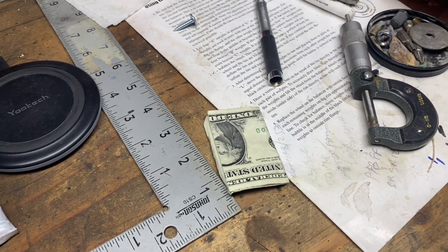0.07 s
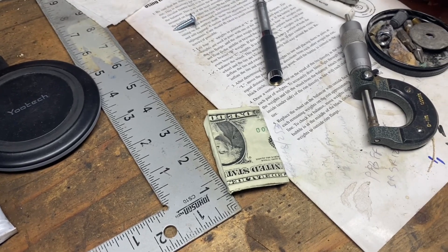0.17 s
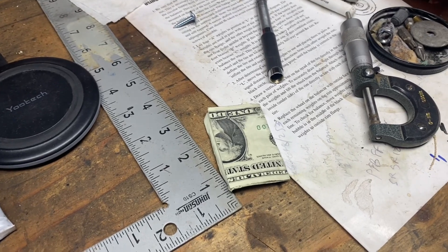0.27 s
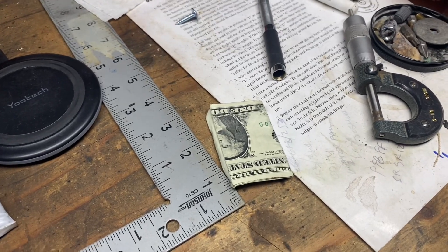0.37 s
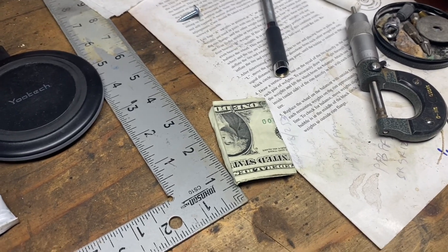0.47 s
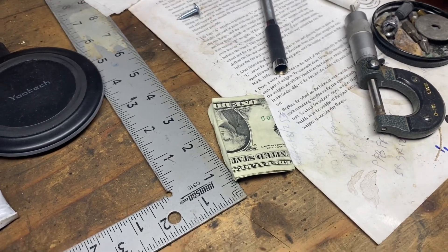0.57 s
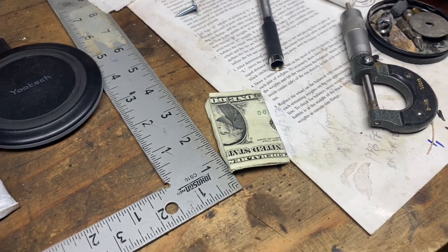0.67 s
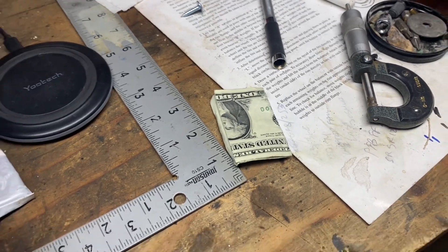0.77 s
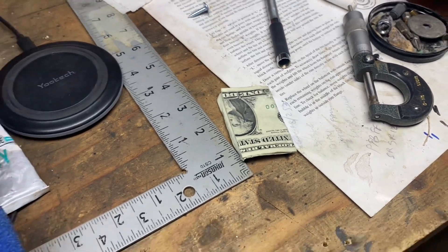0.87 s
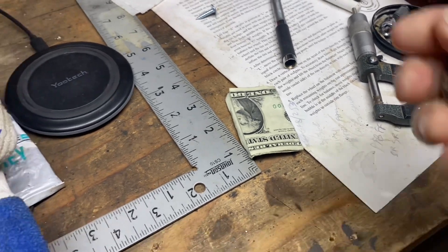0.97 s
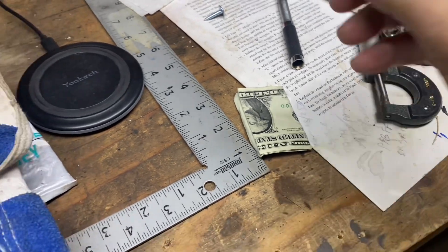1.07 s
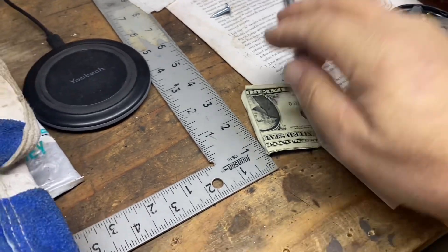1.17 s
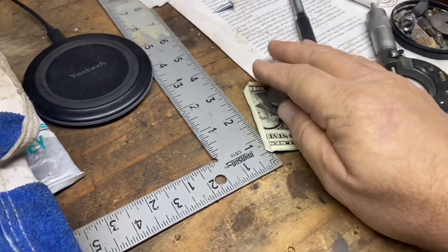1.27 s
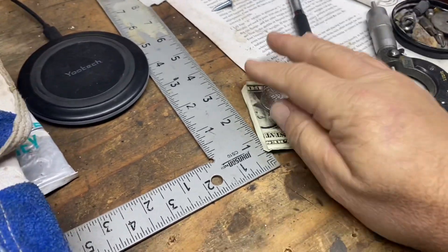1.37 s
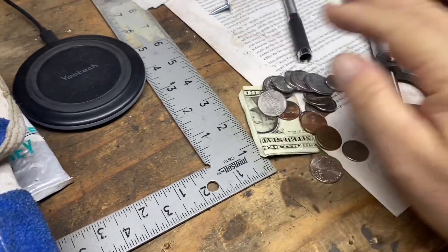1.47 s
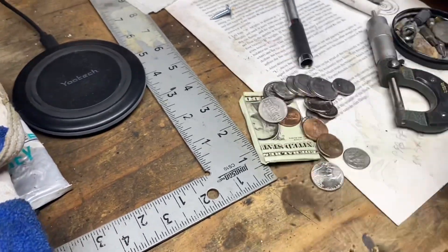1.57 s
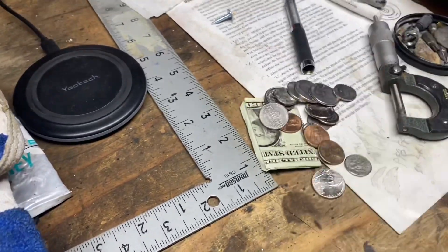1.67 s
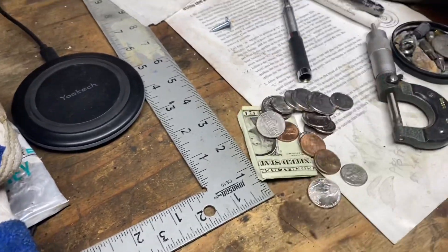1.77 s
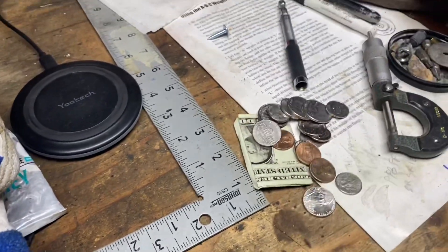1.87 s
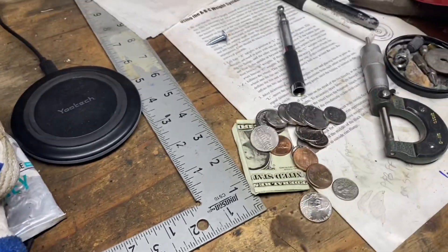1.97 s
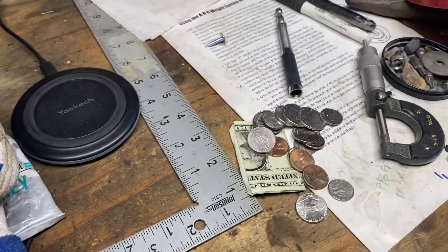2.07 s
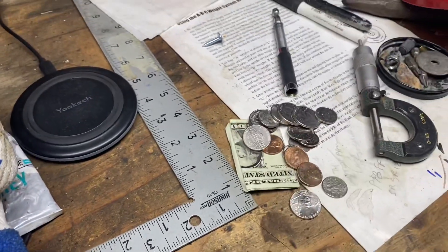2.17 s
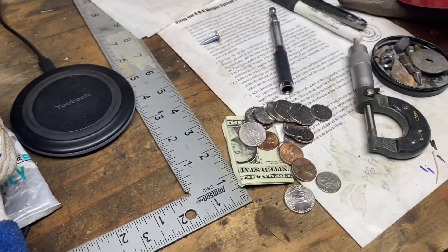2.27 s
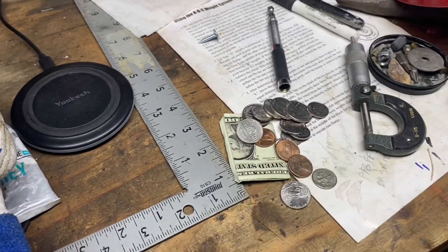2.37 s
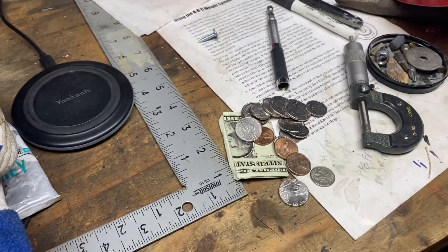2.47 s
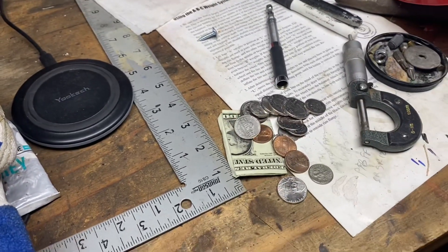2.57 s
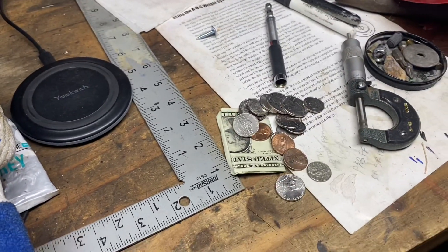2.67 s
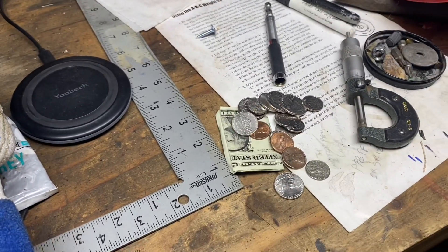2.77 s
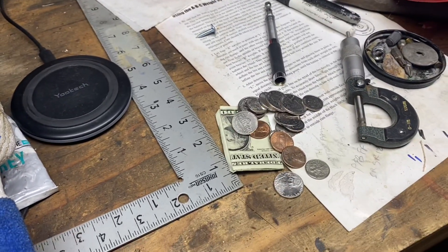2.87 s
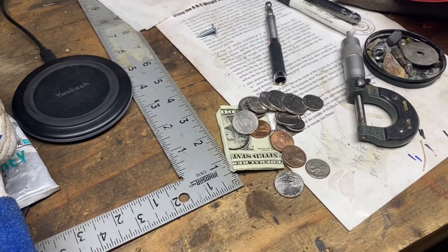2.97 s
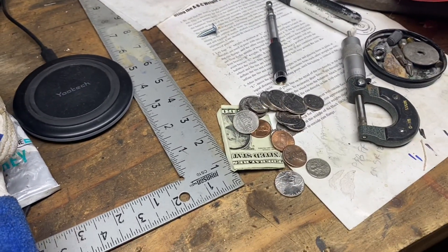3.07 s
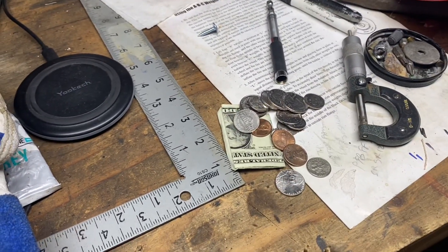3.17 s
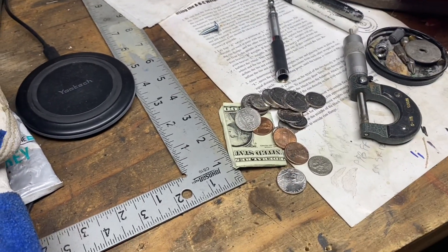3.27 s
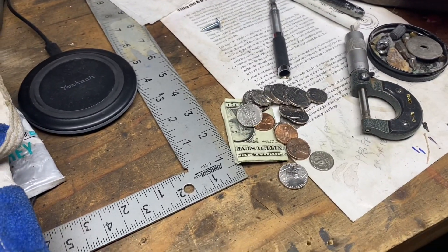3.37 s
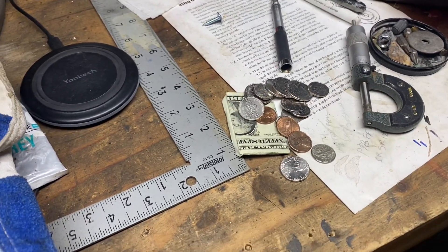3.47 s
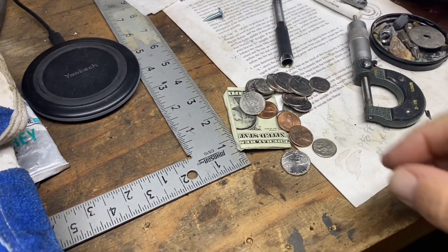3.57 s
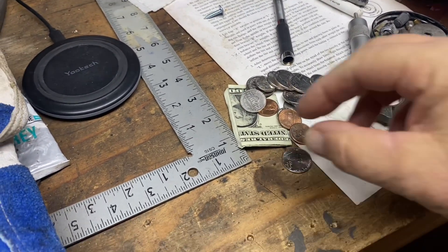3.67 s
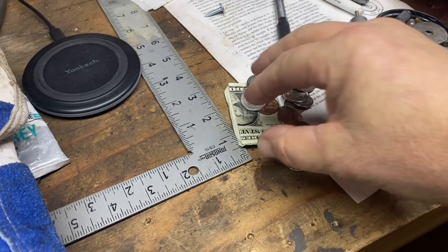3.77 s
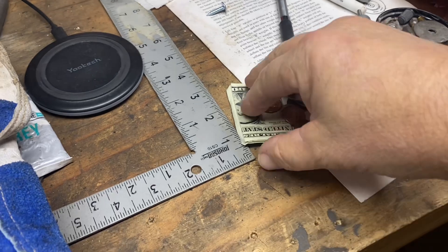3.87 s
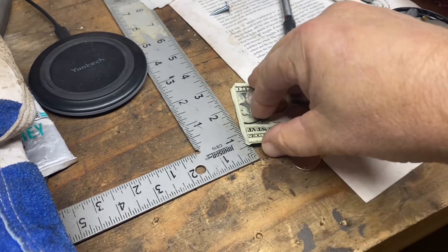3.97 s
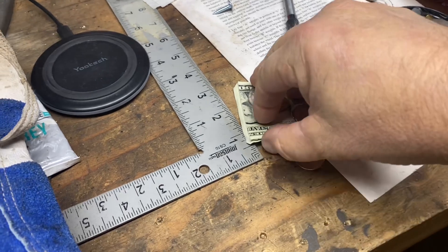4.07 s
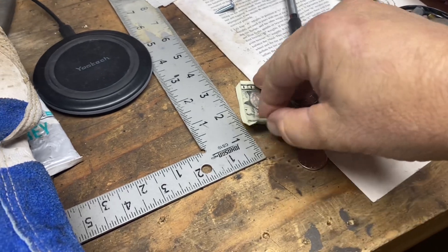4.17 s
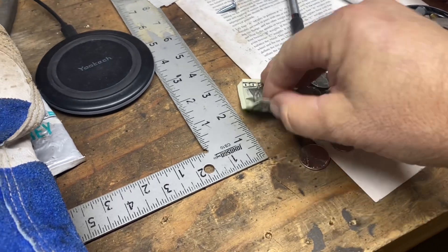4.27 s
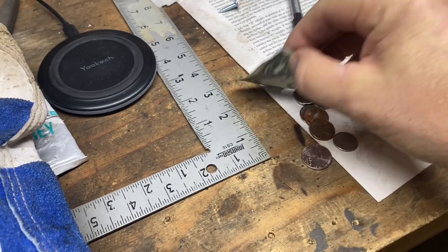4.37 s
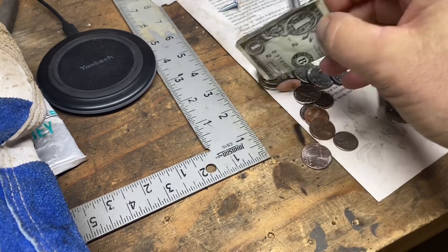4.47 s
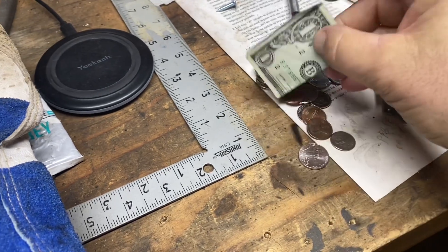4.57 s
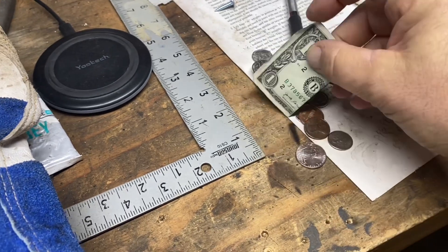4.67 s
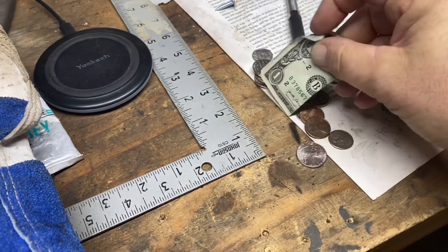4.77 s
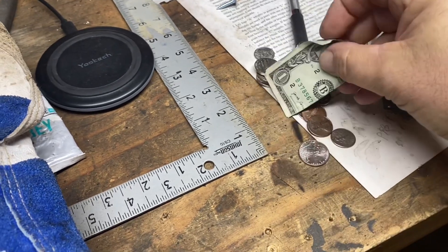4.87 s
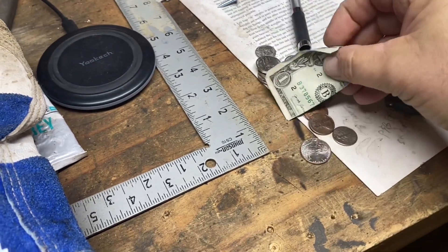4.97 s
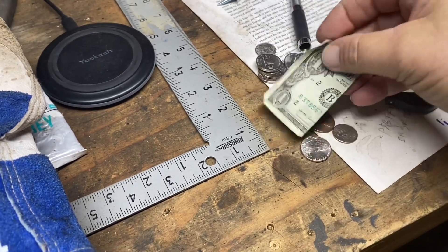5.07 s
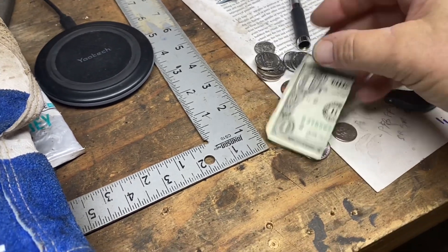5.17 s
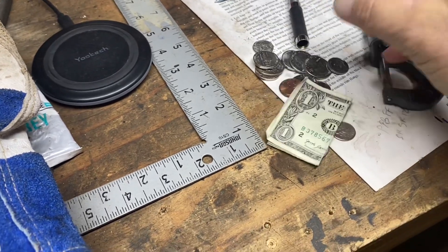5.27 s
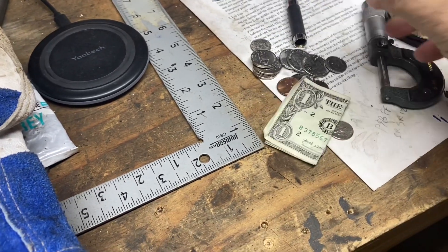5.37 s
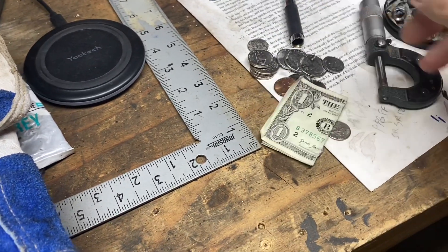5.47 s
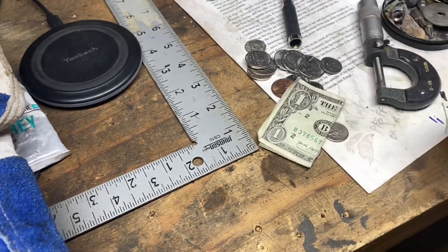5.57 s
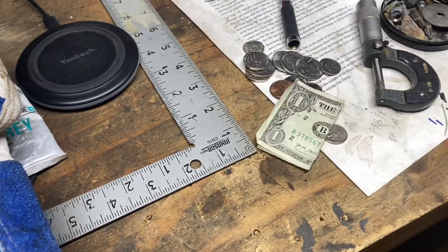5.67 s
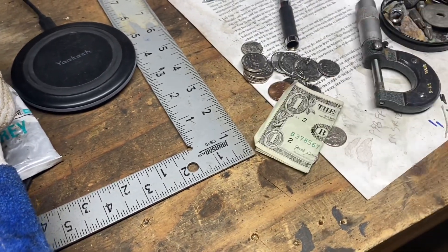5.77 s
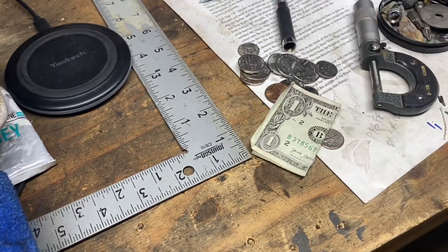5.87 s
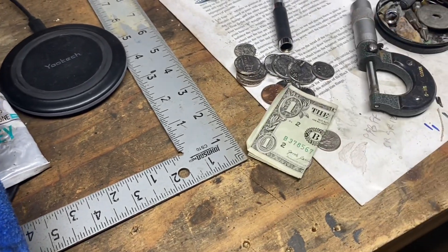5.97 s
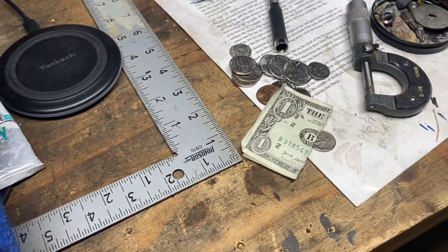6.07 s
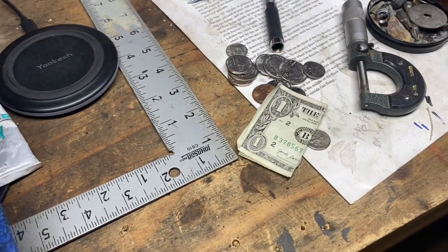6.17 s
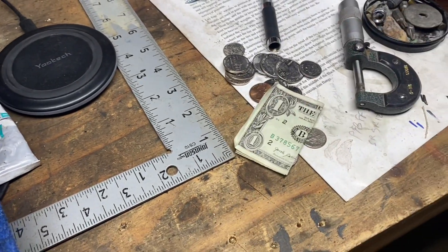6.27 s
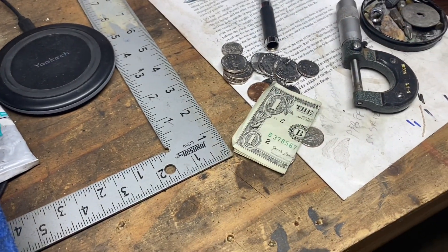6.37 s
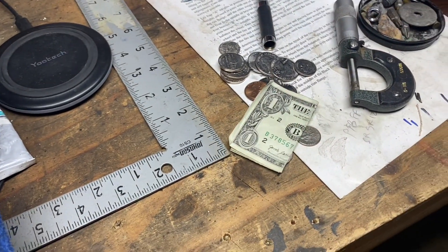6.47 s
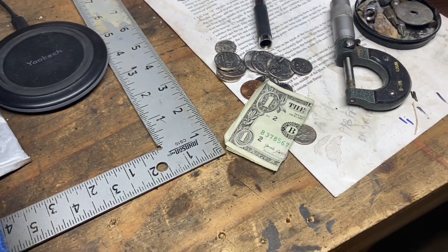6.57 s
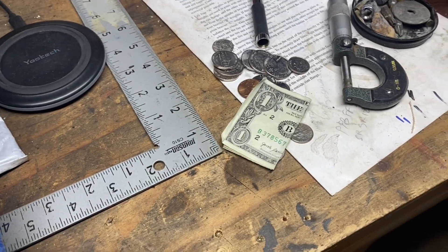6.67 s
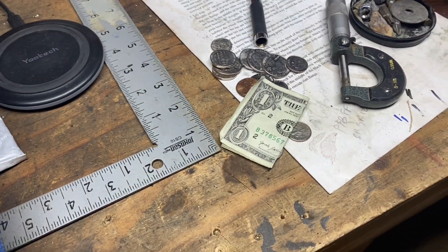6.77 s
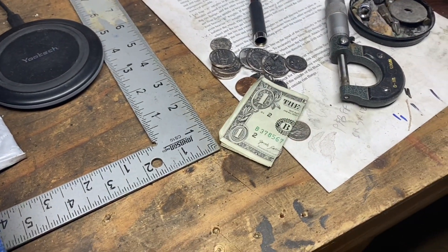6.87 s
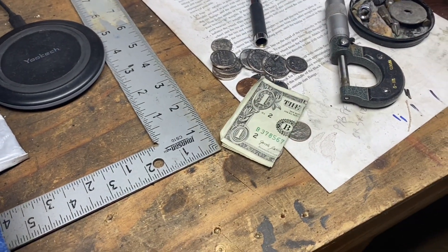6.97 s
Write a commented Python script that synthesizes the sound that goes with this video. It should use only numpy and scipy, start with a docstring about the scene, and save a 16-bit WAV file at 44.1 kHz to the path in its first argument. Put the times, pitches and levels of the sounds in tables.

```python
"""Change in a palm, a folded bill, a wooden bench; a hand-held phone close by in a small quiet workshop.
0-1.2 s: skin and sleeve brush, coins jingle (noise chinks, edge clicks), then are slapped down (plank modes).
1.2-2.7 s: coins settle, soft bumps (damped noise pops), a faint wet-sounding chirp (rising pops).
3.8-5.3 s: bill pulled out and laid on top; coins slide and clink (grainy noise, beating modes), paper crackles.
5.5-7 s: brushing and bumps of the hands. Throughout: still air, rumble in swells, room echo."""
import sys
import numpy as np
from scipy import signal
from scipy.fft import rfft, irfft, next_fast_len
from scipy.io import wavfile
from scipy.ndimage import uniform_filter1d

SR = 44100
rng = np.random.default_rng(int(sys.argv[2]) if len(sys.argv) > 2 else 0)


def dump(signal):
    """Clip the signal to [-1, 1] and save it as 16-bit WAV at the path in sys.argv[1]."""
    limited = np.clip(np.atleast_2d(signal).T, -1, 1)
    pcm = np.round(limited * 32767).astype(np.int16)
    wavfile.write(sys.argv[1], SR, pcm)


N = 309137
HIT_N, BLOW_N = SR // 2, SR // 50  # samples: one short sound; the span that sets its level
T_S = np.arange(HIT_N) / SR

# Levels of events come before the trims (*_db arguments) of the functions that use them.
# coins meeting coins: (time [s], chink level [dB], edge click level [dB], rebound time scale [s])
CLINKS = [(0.627, -74, -66, 0.0096), (0.743, -46, -49, 0.0016), (.758, -44.5, -49, .006),
          (0.768, -39, -48, 0.0083), (0.82, -37, -42.5, 0.0046), (.842, -51, -44, 0.0071),
          (0.881, -68, -51.5, .001), (0.9076, -49, -52, 0.00068), (1.058, -56, -54.5, .002),
          (1.082, -45.5, -51, .0016), (1.1, -47, -52, 0.0062), (1.165, -35, -47.5, .002),
          (1.196, -17.5, -39, 0.0017), (1.204, -23.5, -34, .0022), (3.832, -45, -50.5, 0.01),
          (3.853, -32.5, -42.5, 0.0048), (4.295, -36, -48, 0.0048), (4.321, -42, -51, 0.0045),
          (4.401, -26, -56, 0.0016), (4.407, -26.5, -46, 0.013), (4.484, -51, -68, .0013),
          (4.543, -37, -44, .006), (4.59, -39, -52.5, 0.00076), (5.191, -49, -60.5, 0.00096),
          (5.205, -43.5, -59.5, 0.0038)]
# blows on the bench top: (time [s], thud level [dB], clack level [dB], crack level [dB])
KNOCKS = [(1.196, -26.5, -41, -27.5), (1.2, -25, -23.5, -36), (1.208, -22, -31, -24.5),
          (1.295, -38, -48, -53.5), (1.349, -44.5, -49, -53.5), (3.848, -41.5, -61, -54.5),
          (4.298, -36, -60, -71), (4.401, -21, -39, -55), (4.414, -27, -70, -66), (4.458, -35.5, -59, -60),
          (4.521, -42.5, -61, -60), (4.55, -37.5, -63.5, -66), (4.595, -42, -75, -81),
          (4.671, -38, -65, -57), (4.711, -49, -76, -65), (4.8, -43.5, -65, -74),
          (5.207, -48.5, -61, -49.5)]
# coins left free to ring: (time [s], level [dB], lowest bending mode [Hz], t60 [s])
RINGS = [(1.108, -45.5, 9200, .14), (1.121, -42, 13600, .12), (1.176, -39.5, 14700, .09),
         (1.2, -27, 9840, 0.042), (1.213, -26.5, 14340, .09), (3.872, -41, 15300, 0.14),
         (4.324, -38.5, 13500, .13), (4.402, -40.5, 9290, 0.24), (4.412, -28, 15600, .08),
         (4.414, -29, 13930, 0.19), (4.485, -39.5, 13900, 0.055), (4.549, -27, 14110, .16),
         (4.593, -35, 14200, .12)]
# paper creases, other small dry snaps: (time [s], level [dB], pitch [Hz])
CREASES = [(0.477, -52.5, 5470), (.745, -56.5, 1903), (1.187, -40.5, 2030), (3.967, -56, 5500),
           (3.981, -61, 3470), (3.992, -57, 11000), (4.033, -51, 5100), (4.077, -49, 6740),
           (4.098, -45.5, 3920), (4.099, -52, 1250), (4.121, -59, 2000), (4.154, -47.5, 1460),
           (4.651, -53.5, 1230), (4.833, -51.5, 1680), (4.853, -43, 1400), (4.939, -45.5, 1720),
           (5.112, -52.5, 1537), (5.174, -57.5, 3370)]
# soft bumps of the hands on bench and phone: (time [s], level [dB], pitch [Hz], t60 [s], low boom level [dB])
BUMPS = [(0.442, -38.5, 506, 0.11, -37.5), (1.201, -27, 187.3, .093, -47), (1.202, -24.5, 710, 0.081, -35),
         (1.61, -60, 1110, 0.19, -57), (1.791, -69, 1235, 0.066, -61.5), (1.849, -52, 509.3, 0.063, -51),
         (5.827, -43.5, 850, 0.05, -57.5), (5.9367, -39, 897, 0.017, -58), (5.94, -38, 400, 0.033, -58.5),
         (6.962, -65, 592.6, .08, -55)]
# heap of coins shifting:
# (start [s], length [s], level [dB], swell over the slide [dB], weight on the bench [dB])
COIN_SLIDES = [(.82, 0.032, -52, -7, -34), (1.116, 0.068, -45.5, 2, -28.5), (1.205, 0.31, -43, -14, -1),
               (3.831, 0.066, -41, -3.5, -10), (4.262, 0.17, -52.5, 15, -12),
               (4.462, 0.18, -49.5, -6.5, -9.5), (5.207, 0.072, -47.5, -11, -13)]
# bill dragged and laid down: (start [s], length [s], level [dB], weight on the bench [dB])
PAPER_SLIDES = [(3.958, 0.14, -63, -4.5), (4.088, 0.058, -58.5, 6.5), (4.218, 0.029, -60.5, -4.5),
                (4.642, 0.11, -69.5, 5.5), (4.784, 0.028, -60, 8.5), (4.865, .13, -69.5, 8),
                (5.004, .08, -63, -15.5)]
# skin and sleeve brushing: (start [s], length [s], level [dB], swell over the stroke [dB], brightness [dB])
BRUSHES = [(0, 0.21, -67, 5, -2.5), (0.198, 0.21, -58.5, 3.5, -4), (0.43, 0.019, -49.5, 3.5, -6.5),
           (0.6, 0.039, -78.5, -0.5, 14.5), (0.714, 0.33, -70.5, -1, 7.5), (1.505, 0.033, -65, -2, -5.5),
           (1.53, 0.31, -67, -2, -21.5), (1.836, 0.041, -51.5, 1.5, -15.5), (5.501, 0.34, -81, 16.5, -18.5),
           (5.812, 0.028, -50.5, 3, -12.5), (5.922, 0.033, -49.5, -0.5, -23.5), (6.152, .15, -83, 3, -2),
           (6.948, 0.051, -74, 3.5, -8)]
# shifts of the hand that holds the phone: (start [s], length [s], rumble level [dB])
SWAYS = [(0, 0.52, -62.5), (0.456, 0.058, -57), (1.198, 0.87, -58.5), (3.816, 1.05, -56.5),
         (5.722, 0.26, -54), (6.961, 0.034, -52.5)]
# modes of the bench top: (frequency [Hz], relative level [dB], t60 [s])
BENCH_MODES = [(184.1, -0.5, 0.25), (325, 2, 0.099), (361, -4, 0.0893), (405, 7, 0.066), (445, -2, .08),
               (558, -2, 0.063), (647, -3.5, 0.16), (753, -2.5, 0.046), (934.7, -5.5, 0.021),
               (1217, -1, 0.0722), (1475, 1.5, 0.024), (1570, -6.5, 0.022), (1711, -8, 0.043)]
# spectrum of coin faces chinking: (frequency [Hz], relative level [dB])
CHINK_SPECTRUM = [(5000, -33), (8300, -23.5), (9500, -2), (11200, -7), (12200, -22.5), (13300, -4),
                  (15300, 2), (16500, -14)]
# spectrum of coin edges clicking: (frequency [Hz], relative level [dB])
EDGE_SPECTRUM = [(500, -26), (2000, -7.5), (4000, -4.5), (6600, 5), (8200, -5), (12000, -20)]
# spectrum of the contact crack on the bench: (frequency [Hz], relative level [dB])
CRACK_SPECTRUM = [(700, -13.5), (2000, -5), (3300, -0.5), (5000, 2), (6800, -1), (8200, -15.5),
                  (12000, -25)]
# spectrum of low scuffing: (frequency [Hz], relative level [dB])
SCUFF_SPECTRUM = [(60, -10.5), (200, -1.5), (380, 0.5), (520, -2.5), (800, -4.5), (1550, -3.5),
                  (2400, -15.5), (5000, -30), (16000, -50)]
# spectrum of dry hiss: (frequency [Hz], relative level [dB])
HISS_SPECTRUM = [(500, -15.5), (2000, -3), (3500, 1.5), (5000, 0), (6800, 0), (8300, -11.5), (12000, -16.5),
                 (16000, -21.5)]
# spectrum of coins scraping: (frequency [Hz], relative level [dB])
SCRAPE_SPECTRUM = [(4000, -40), (8300, -20), (9500, 3.5), (11200, -3.5), (12200, -15), (13300, 0),
                   (14400, 1.5), (15400, -1.5), (16500, -12.5)]
# spectrum of the still air: (frequency [Hz], relative level [dB])
AIR_SPECTRUM = [(12, -62), (20, -29.5), (48, -1), (107, -7), (134, -11.5), (154, -24.5), (241, -19),
                (337, -26.5), (410, -25.5), (718, -29.5), (1190, -32.5), (2460, -38.5), (9950, -48.5),
                (16000, -62)]

AIR_DB = -66.5
ROOM_T60_S, ROOM_TREBLE_T60_S, ROOM_DB = 0.34, 0.35, -13
TOP_HZ = 15800
CREASE_T60_S = 0.026
BOOM_HZ, BOOM_T60_S, BOOM_LAG_S = 68.5, 0.11, 0.012  # the whole bench answers a bump a little late
CHIRP_START_S, CHIRP_DB, CHIRP_HZ = 2.672, -63.5, 1302
CHIRP_GAP_S, CHIRP_RISE_HZ_PER_S, CHIRP_FADE_DB_PER_S = 0.008, 19000, 237.5


def amp(db):
    """Decibels to gain."""
    return 10 ** (np.asarray(db) / 20)


def fade(t60_s):
    """Exponential decay."""
    return np.exp(-np.log(1000) * T_S / max(t60_s, 1 / SR))


def strength(x, db):
    """Scale a hit so that its first 20 ms have this rms level."""
    return x * amp(db) / np.sqrt(np.mean(x[:, :BLOW_N] ** 2))


def add(out, time_s, x):
    """Mix a short sound in."""
    start = int(time_s * SR)
    out[:, start:start + HIT_N] += x[:, :N - start]


def band(x, lo_hz, hi_hz):
    """Causal band-pass, edges held inside the usable range."""
    edges_hz = [min(lo_hz, SR / 3), min(hi_hz, SR / 2 - 500)]
    return signal.sosfilt(signal.butter(2, edges_hz, "band", fs=SR, output="sos"), x)


def noise(size, apart_hz=1500):
    """Noise at two microphone ports: the bass is shared, the treble unrelated."""
    padded = next_fast_len(size, True)
    mid, side = rfft(rng.standard_normal((2, padded)))
    hz = np.fft.rfftfreq(padded, 1 / SR)
    share = hz / np.hypot(hz, apart_hz)
    ports = np.array([mid + share * side, mid - share * side]) / np.sqrt(1 + share ** 2)
    return irfft(ports, padded)[:, :size]


def colour(x, spectrum):
    """Filter by (frequency [Hz], level [dB]) points, then scale to rms 1."""
    hz, db = np.transpose(spectrum)
    size = next_fast_len(x.shape[1])
    gain = amp(np.interp(np.log(np.fft.rfftfreq(size, 1 / SR) + 1), np.log(hz), db))
    y = irfft(rfft(x, size) * gain, size)[:, :x.shape[1]]
    return y / y.std()


def lean(x, left_db):
    """Make the left side louder than the right."""
    return x * amp(np.array([[left_db], [-left_db]]) / 2)


def walk(rate_hz):
    """Smooth random wander with a spread near 1."""
    step = max(int(SR / rate_hz), 2)
    levels = np.repeat(rng.standard_normal(N // step + 1), step)
    return uniform_filter1d(levels, step)[:N]


def stroke(start_s, length_s, db, attack_s, release_t60_s, swell_db=0):
    """Envelope of one movement: sets in, holds or drifts evenly in dB, dies away."""
    t_s = np.arange(N) / SR - start_s
    progress = np.clip(t_s / length_s, 0, 1)
    release_db = -60 * np.maximum(t_s - length_s, 0) / release_t60_s
    return np.clip(t_s / attack_s, 0, 1) * amp(db + swell_db * progress + release_db)


def snags(rate_hz, t60_s, spread_db):
    """Envelope of small catches at random moments, each dying quickly; rms 1."""
    hits = rng.random(N) < rate_hz / SR
    energy = hits * amp(spread_db * rng.uniform(-0.85, 1, N)) ** 2
    power = signal.lfilter([1], [1, -amp(-120 / (t60_s * SR))], energy)
    return np.sqrt(power / (power.mean() + 1e-12))


def ring(modes, scatter_db):
    """Decaying modes; each blow lands elsewhere and weights them anew."""
    out = np.zeros(HIT_N)
    for hz, db, t60_s in modes:
        gain = amp(db + scatter_db * rng.standard_normal())
        out += gain * np.sin(2 * np.pi * hz * T_S) * fade(t60_s)
    return out


def pops(table, spread, skirt_db, left_db, rise_s):
    """Short damped noise pops, each around its own pitch, with a weaker broad snap."""
    out = np.zeros((2, N))
    for time_s, db, hz, t60_s in table:
        push = noise(HIT_N) * fade(t60_s) * (1 - np.exp(-T_S / rise_s))
        body = band(push, hz / (1 + spread), hz * (1 + spread))
        snap = band(push, hz / 4, hz * 5)
        add(out, time_s, strength(body, db) + strength(snap, db + skirt_db))
    return lean(out, left_db)


def background(rumble_db=-2, air_db=0.0):
    """Still workshop air, and the rumble of the hand that holds the phone."""
    rumble = band(noise(N, apart_hz=400), 54, 100)
    sway = sum(stroke(start_s, length_s, db, attack_s=0.03, release_t60_s=0.86)
               for start_s, length_s, db in SWAYS)
    air = colour(noise(N, apart_hz=500), AIR_SPECTRUM)
    return air * amp(AIR_DB + air_db) + rumble / rumble.std() * sway * amp(rumble_db)


def workshop(dry, split_hz=2500, treble_db=-6, build_s=0.013):
    """Diffuse echo of a cluttered room: two noise bands build up, then decay at nearly equal rates."""
    t_s = np.arange(SR) / SR
    low = band(noise(SR, apart_hz=400), 100, split_hz) * amp(-60 * t_s / ROOM_T60_S)
    high = band(noise(SR), split_hz, 10000) * amp(treble_db - 60 * t_s / ROOM_TREBLE_T60_S)
    tail = (low + high) * (1 - np.exp(-t_s / build_s)) / np.sqrt(SR / 20)
    return amp(ROOM_DB) * signal.fftconvolve(dry, tail, axes=1)[:, :N]


def clutter(dry, echo_db=-17, longest_s=0.007, count=6):
    """Tools close by throw back quick echoes that comb the treble, differently at each port."""
    bright = band(dry, 1500, 16000)
    lags = (rng.uniform(0.1, 1, (2, count)) * longest_s * SR).astype(int)
    echoes = [sum(np.roll(port, lag) for lag in row) for port, row in zip(bright, lags)]
    return dry + amp(echo_db) * np.array(echoes)


def chirp(count=4):
    """A faint wet-sounding run of narrow pops, rising in pitch and fading."""
    pulses = [(CHIRP_START_S + t_s, CHIRP_DB - CHIRP_FADE_DB_PER_S * t_s,
               CHIRP_HZ + CHIRP_RISE_HZ_PER_S * t_s, 0.025)
              for t_s in CHIRP_GAP_S * np.arange(count)]
    return pops(pulses, spread=0.23, skirt_db=-33.5, left_db=8.0, rise_s=0.0041)


def handling():
    """Each bump is a dull pop followed by a low boom."""
    bodies = [(time_s, db, hz, t60_s) for time_s, db, hz, t60_s, _ in BUMPS]
    booms = [(time_s + BOOM_LAG_S, boom_db, BOOM_HZ, BOOM_T60_S) for time_s, _, _, _, boom_db in BUMPS]
    return (pops(bodies, spread=0.48, skirt_db=-20.5, left_db=2.0, rise_s=0.0008)
            + pops(booms, spread=0.56, skirt_db=-15.5, left_db=0.74, rise_s=0.0006))


def brushing(attack_s=0.014, release_t60_s=0.26, scrape_db=-3):
    """Scuff, hiss and scrape gains of skin and cloth: brightness lifts hiss and scrape over scuff."""
    return sum(np.outer(amp([0, bright_db, bright_db + scrape_db]),
                        stroke(start_s, length_s, db, attack_s, release_t60_s, swell_db))
               for start_s, length_s, db, swell_db, bright_db in BRUSHES)


def sliding_paper(attack_s=0.016, release_t60_s=0.23, scrape_db=3.0):
    """Scuff, hiss and scrape gains of the bill: the harder it is pressed down, the more it scuffs."""
    return sum(np.outer(amp([weight_db, 0, scrape_db]),
                        stroke(start_s, length_s, db, attack_s, release_t60_s))
               for start_s, length_s, db, weight_db in PAPER_SLIDES)


def sliding_coins(attack_s=0.012, release_t60_s=0.098, hiss_db=-3, hiss_per_weight=0.55):
    """Scuff, hiss and scrape gains of the heap: bearing harder, it scuffs and hisses more."""
    return sum(np.outer(amp([weight_db, hiss_db + hiss_per_weight * weight_db, 0]),
                        stroke(start_s, length_s, db, attack_s, release_t60_s, swell_db))
               for start_s, length_s, db, swell_db, weight_db in COIN_SLIDES)


def rubbing(scuff_gain, hiss_gain, scrape_gain, grain_rate_hz=700, grain_db=1.5, flutter_db=0.0,
            catch_db=3, patchy_db=3):
    """Sliding surfaces catch and slip in tiny grains: low scuff, dry hiss, bright scrape."""
    grip = amp(grain_db * walk(grain_rate_hz) + flutter_db * walk(45))
    scuff = colour(noise(N) * grip, SCUFF_SPECTRUM) * scuff_gain
    # small and large wrinkles speak in different octaves, each at its own moments
    wrinkles = sum(band(noise(N), hz, 2 * hz) * amp(patchy_db * walk(90))
                   for hz in 1000 * 2.0 ** np.arange(4))
    hiss = colour(wrinkles * grip, HISS_SPECTRUM) * hiss_gain
    # milled rims catch on each other in coarser steps
    catches = amp(catch_db * walk(220))
    scrape = colour(noise(N) * grip * catches, SCRAPE_SPECTRUM) * scrape_gain
    return scuff + hiss + scrape


def crackle(rate_hz=22, t60_s=0.012, spread_db=9, count=5):
    """Wrinkles of different sizes snap, each size at its own pitch and its own moments."""
    snaps = sum(band(noise(N), hz, 1.5 * hz) * snags(rate_hz, t60_s, spread_db)
                for hz in 1200 * 1.5 ** np.arange(count))
    return colour(snaps, HISS_SPECTRUM)


def friction(tick_db=-8, tap_db=-7, crackle_db=-3):
    """All that slides; on the way rims tick, coins tap the plank and small wrinkles crackle."""
    heap = sliding_coins()
    money = heap + sliding_paper()
    rim_catches = snags(rate_hz=22, t60_s=0.02, spread_db=4.5)
    ticks = colour(noise(N), CHINK_SPECTRUM) * rim_catches * heap[2] * amp(tick_db)
    plank_catches = snags(rate_hz=45, t60_s=0.055, spread_db=5.5)
    taps = colour(band(noise(N), 250, 2000), SCUFF_SPECTRUM) * plank_catches * heap[0] * amp(tap_db)
    crackling = crackle() * money[1] * amp(crackle_db)
    return rubbing(*(money + brushing())) + ticks + taps + crackling


def creases():
    """Folds of the paper snap: broad noise pops with a very fast rise."""
    snaps = [(time_s, db, hz, CREASE_T60_S) for time_s, db, hz in CREASES]
    return pops(snaps, spread=0.4, skirt_db=-11.5, left_db=3.0, rise_s=0.0002)


def bench(grain_t60_s=0.048, grain_db=0, crack_t60_s=0.064, split_hz=780, thud_trim_db=-8,
          clack_trim_db=0, crack_trim_db=0):
    """Hand and coins strike the plank: low modes thud, high ones clack, the contact cracks."""
    out = np.zeros((2, N))
    for time_s, thud_db, clack_db, crack_db in KNOCKS:
        plank = ring(BENCH_MODES, scatter_db=4.5)
        # loose tools on the bench blur its modes
        blur = band(noise(HIT_N), 120, 1800) * fade(grain_t60_s)
        wood = strength(np.array([plank, plank]), 0) + strength(blur, grain_db)
        thud = strength(band(wood, 230, split_hz), thud_db + thud_trim_db)
        clack = strength(band(wood, 1290, 1680), clack_db + clack_trim_db)
        crack = colour(noise(HIT_N), CRACK_SPECTRUM) * fade(crack_t60_s)
        crack = strength(crack, crack_db + crack_trim_db)
        add(out, time_s, lean(thud, left_db=1.7))
        add(out, time_s, lean(clack, left_db=6.5))
        add(out, time_s, lean(crack, left_db=4.5))
    return out


def free_coins(split_hz=130, twin_db=-6, buzz_db=-15, ring_db=1):
    """The stamped relief splits a coin's mode into a beating pair; touching its neighbours it buzzes."""
    out = np.zeros((2, N))
    for time_s, db, hz, t60_s in RINGS:
        pair = [(hz, 0, t60_s), (hz + split_hz * rng.standard_normal(), twin_db, t60_s)]
        # each port hears another side of the disc, and one hears it a sample later
        tone = np.array([ring(pair, scatter_db=4.5), np.roll(ring(pair, scatter_db=2), 1)])
        buzz = band(noise(HIT_N), hz - 400, hz + 400) * fade(t60_s)
        add(out, time_s, strength(tone, db + ring_db) + strength(buzz, db + buzz_db))
    return out


def rattle(scale_s, rebound=0.7, count=9):
    """A first contact, then a few smaller rebounds that die away."""
    waits = rng.exponential(size=count)
    contacts = np.zeros(HIT_N)
    contacts[0] = 1
    places = np.minimum(waits * scale_s * SR, HIT_N - 1).astype(int)
    np.add.at(contacts, places, rebound * np.exp(-waits / 2))
    return contacts


def excite(force, response):
    """What a body does when this force drives it."""
    return signal.fftconvolve(np.atleast_2d(force), np.atleast_2d(response), axes=1)[:, :HIT_N]


def chatter(spectrum, scale_s, t60_s, patchy_db, rise_s=0.00067):
    """Glancing contacts between damped discs; each pile has resonances of its own."""
    hz, db = np.transpose(spectrum)
    grid_hz = np.linspace(500, 17000, 56)
    pile_db = np.interp(np.log(grid_hz), np.log(hz), db) + patchy_db * rng.standard_normal(len(grid_hz))
    contact = fade(t60_s) * (1 - np.exp(-T_S / rise_s))
    return colour(noise(HIT_N), np.c_[grid_hz, pile_db]) * excite(rattle(scale_s), contact)


def coins(chink_t60_s=0.016, click_t60_s=0.068, chink_trim_db=0, click_trim_db=-1, patchy_db=4):
    """Coins pressed together meet, chink briefly and click at their edges."""
    out = np.zeros((2, N))
    for time_s, chink_db, click_db, scale_s in CLINKS:
        chink = chatter(CHINK_SPECTRUM, scale_s, chink_t60_s, patchy_db)
        click = chatter(EDGE_SPECTRUM, scale_s, click_t60_s, patchy_db)
        add(out, time_s, strength(chink, chink_db + chink_trim_db))
        add(out, time_s, strength(click, click_db + click_trim_db))
    return out


def scene(paper_echo_db=-4):
    """Money, bench and handling noise in the room; creases excite the room less."""
    paper = creases()
    dry = clutter(coins() + free_coins() + bench() + handling() + chirp() + friction())
    return dry + paper + workshop(dry + paper * amp(paper_echo_db)) + background()


def record(dry):
    """The phone softly rounds loud peaks and cuts the top."""
    return signal.sosfilt(signal.ellip(8, 0.2, 70, TOP_HZ, fs=SR, output="sos"), np.tanh(dry))


dry = scene()
out = record(dry)
dump(out)
```